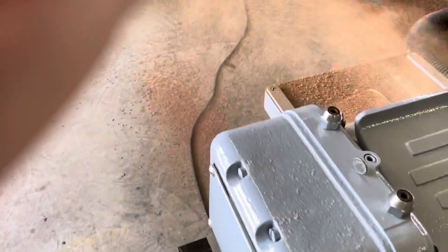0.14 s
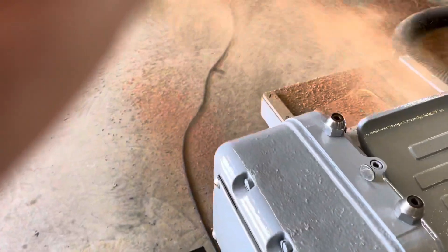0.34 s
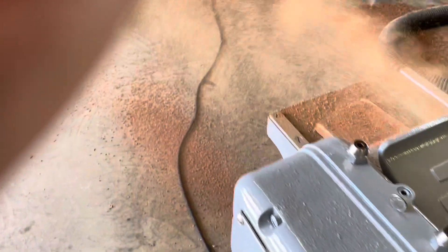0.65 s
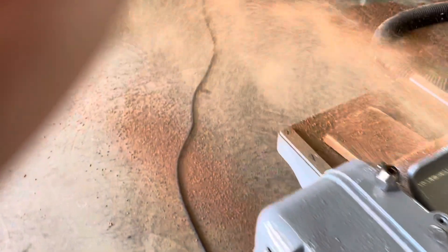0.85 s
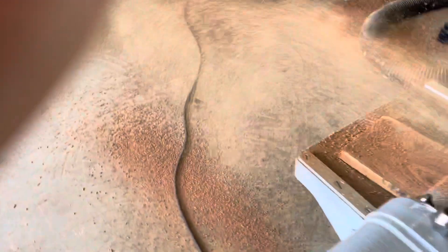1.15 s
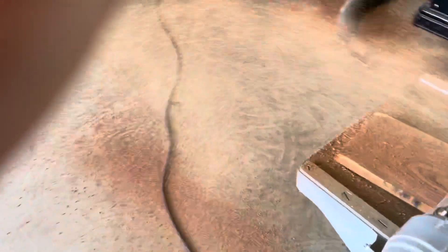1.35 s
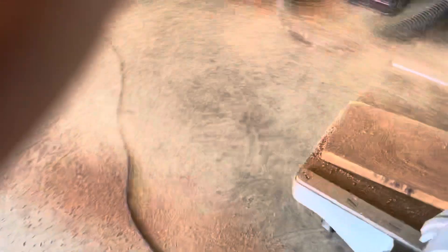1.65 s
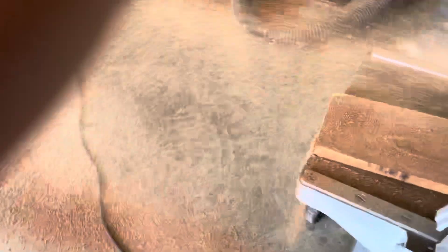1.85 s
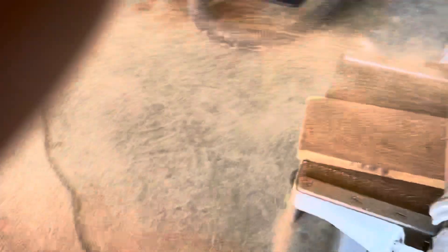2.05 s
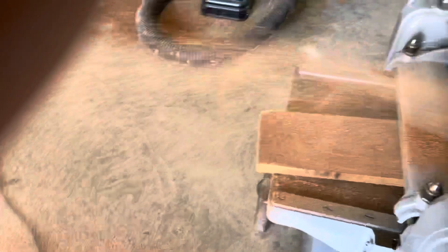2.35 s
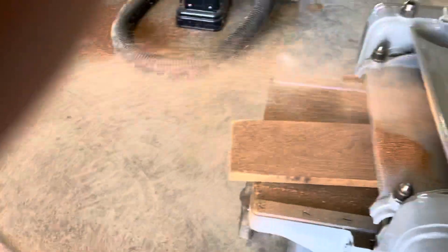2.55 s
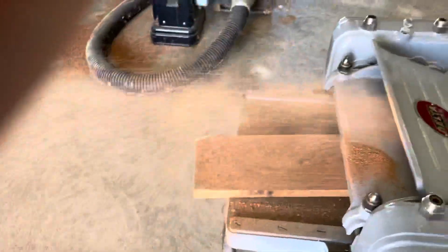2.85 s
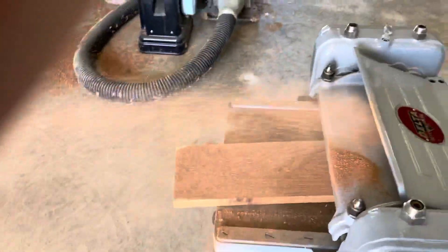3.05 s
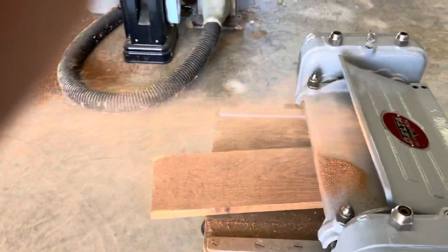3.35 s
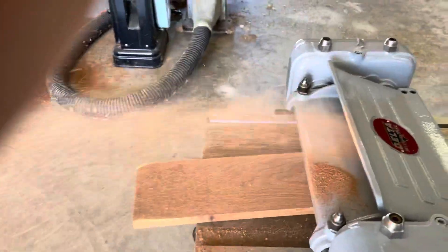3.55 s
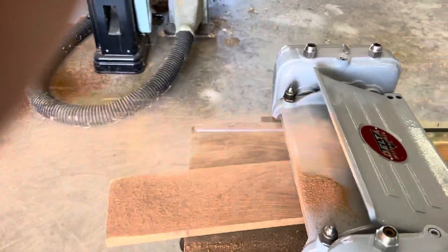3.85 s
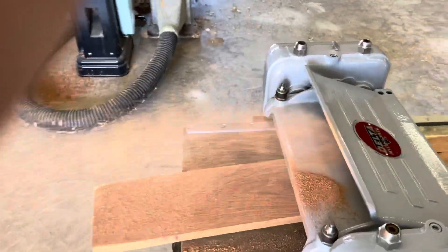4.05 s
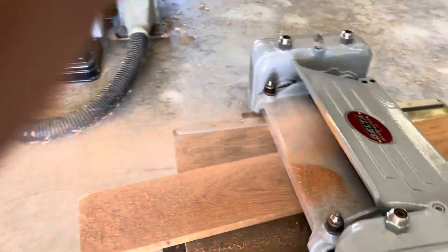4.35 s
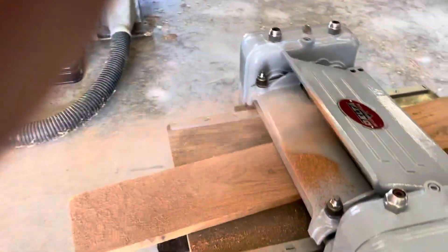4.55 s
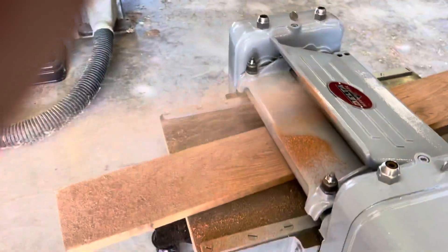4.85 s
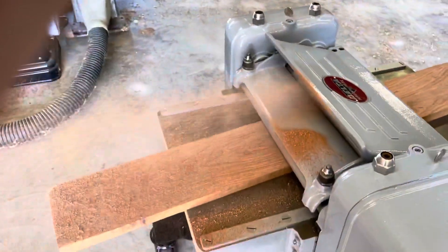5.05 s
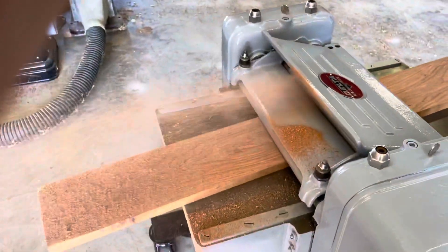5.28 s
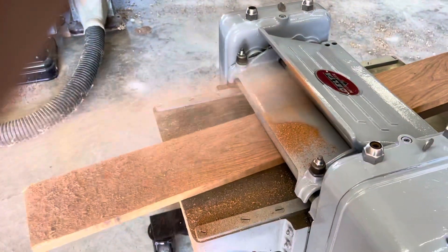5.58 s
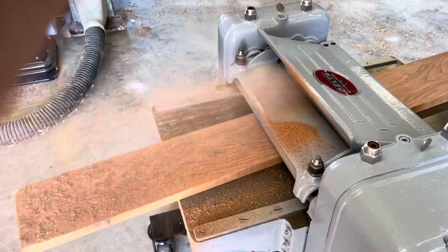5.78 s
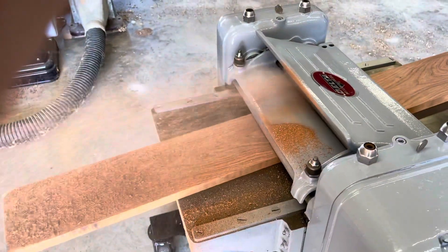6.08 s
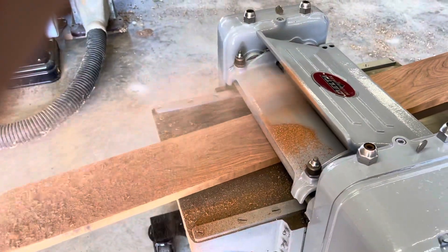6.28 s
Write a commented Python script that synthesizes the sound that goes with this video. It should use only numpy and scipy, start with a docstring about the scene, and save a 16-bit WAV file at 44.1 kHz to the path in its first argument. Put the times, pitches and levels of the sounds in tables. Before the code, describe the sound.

A thickness planer runs without pause in a small workshop. Under a steady low electrical hum, the cutterhead makes a fast, rough buzz with ringing metallic overtones. Air and wood chips rush and hiss. The close stereo microphone moves round the machine, so different metal tones swell and fade; the tearing of the board grows brighter and cracklier, with small knocks around the middle and later on.

```python
"""In a workshop, a thickness planer takes a light cut from a board while the microphone walks round it.
Three knives bite unevenly: click trains ring banks of resonances for the hood, bed and other parts.
Torn fibres are noise bursts at each bite, split into dull crush and bright hiss; hard bites knock the board.
The motor is steady sines with its hum at twice the mains frequency; shaped noise makes the rush of chips
and cooling air and a low rumble. The ringing also returns from the floor and the workshop."""
import sys
import numpy as np
from scipy import signal
from scipy.fft import rfft, irfft, next_fast_len
from scipy.io import wavfile
from scipy.ndimage import uniform_filter1d, map_coordinates

SR = 44100
rng = np.random.default_rng(int(sys.argv[2]) if len(sys.argv) > 2 else 0)


def generate_wav(sig):
    """Save sig (samples, or channels by samples) to the path in sys.argv[1] as 16-bit PCM at SR."""
    pcm = np.round(np.clip(np.atleast_2d(sig).T, -1, 1) * 32767).astype(np.int16)
    wavfile.write(sys.argv[1], SR, pcm)


N = 283122
TIME = np.arange(N) / SR
SIZE = next_fast_len(N + SR)
HZ = np.maximum(np.arange(SIZE // 2 + 1) * SR / SIZE, 1)

# how each part is heard on the walk; rows: frame, stand, base, rail, bed, table, roller, hood, guard,
# cover, chute, flap, baffle, lip, plate, gibs, knives, knife tips
# columns: start_level_db, drift_db_per_s, first_rise_db, first_s, first_spread_s,
# second_change_db, second_s, second_spread_s, swell_db, swell_top_s, ring_lag_ms
HEARD = [(-44.5, -0.2, 6.8, 4.86, 2.65, 0.5, 0.25, 0.25, 0.1, -0.051, 0.03),
         (-41.5, -1, 7, 4.82, 0.35, 3.5, 3.54, 0.35, 0.15, -0.98, -0.21),
         (-48, 1.24, 6.1, 5.07, 0.7, 6, 3.08, 0.56, 0.74, 0.52, -0.13),
         (-49.5, 2.36, 9.4, 2.95, 0.47, 2.5, 5.48, 0.23, 1.1, -0.16, -0.25),
         (-40, -0.4, 4.3, 3.3, 0.4, 3.5, 6.3, 0.26, 1.8, 0.37, -0.36),
         (-38, -0.21, 9.7, 4, 0.69, 3.5, 1.1, 0.14, 1.9, 0.033, -0.11),
         (-43.5, 1.7, 15.6, 0.23, 0.97, 3.5, 4.82, 0.17, 0.74, 0.3, -0.71),
         (-32, -0.01, 7, 3.63, 1.04, 3, 1.82, 0.45, 0.13, -1.4, -0.72),
         (-45.5, 2.5, 5.9, 1.8, 1.22, 2.5, 0.95, 0.15, 1.1, 0.77, -0.33),
         (-39, 1.6, 2.56, 5.13, 0.22, -38, 1.55, 0.25, 2.9, -0.006, -0.21),
         (-44, 2.1, 8.2, 1.68, 0.42, 5.5, 5.45, 0.37, 3, 0.35, -0.21),
         (-40.5, 0.25, 5.7, 1.6, 0.15, 3.5, 0.42, 0.33, 3, 0.000065, 0),
         (-42, 0.65, 1.7, 1.63, 0.11, 3.5, 0.33, 0.25, 1.1, -0.019, 0.01),
         (-57, 2.5, 8.5, 3.82, 0.35, 6.5, 5.47, 0.33, 0.64, 0.73, 0.13),
         (-58.5, 2, 14.4, 3.94, 0.5, 3, 6, 0.29, 1, -0.026, 0.14),
         (-66.5, 1.2, 13, 1.96, 0.19, -3, 4.5, 0.27, 0.77, -1.2, 0.25),
         (-57, 1.04, 12.5, 0.9, 0.46, 10, 1.7, .2, .6, -0.75, 0.35),
         (-59, -0.35, 14, 2.09, 0.1, 9, 1.64, 0.27, .6, -0.21, 0.33)]
HOOD_ROW = 7


def from_db(db):
    """Gain of a level in dB."""
    return 10 ** (np.asarray(db) / 20)


def rms_one(x):
    """Scaled to rms 1."""
    return x / np.sqrt(np.mean(x ** 2) + 1e-20)


def in_time(rows):
    """Columns of a curve table, interpolated at every sample."""
    s, *columns = np.transpose(rows)
    return [np.interp(TIME, s, column) for column in columns]


def at_hz(points):
    """A spectrum table on the FFT grid, interpolated over log frequency."""
    hz, value = np.transpose(points)
    return np.interp(np.log(HZ), np.log(np.maximum(hz, 1)), value)


def shaped(x, response):
    """Filtered by a response on the FFT grid."""
    return irfft(rfft(x, SIZE) * response, SIZE)[..., :N]


def resonate(x, hz, width_hz):
    """Two-pole resonance, gain 1 on top; a narrower width rings longer."""
    radius = np.exp(-np.pi * width_hz / SR)
    feed = np.array([1, 0, -1]) * (1 - radius * radius) / 2
    back = [1, -2 * radius * np.cos(2 * np.pi * hz / SR), radius * radius]
    return signal.lfilter(feed, back, x)


def clicks(at, size):
    """Clicks at fractional sample times, shared between the two nearest samples."""
    out, whole = np.zeros(N), at.astype(int)
    out[whole] = size * (1 - at + whole)
    out[whole + 1] = size * (at - whole)
    return out


def bump(centre_s, spread_s):
    """Bell-shaped rise and fall, top 1."""
    return np.exp(-.5 * ((TIME - centre_s) / spread_s) ** 2)


def heard_db(row):
    """A part drifts with distance, rises around one time, rises or dips around a second and swells slowly."""
    db, drift_db, first_db, first_s, first_spread_s = row[:5]
    second_db, second_s, second_spread_s, swell_db, top_s = row[5:-1]
    swell_period_s = 1.537   # shared by all the parts
    swell = swell_db * np.cos(2 * np.pi * (TIME - top_s) / swell_period_s)
    changes = first_db * bump(first_s, first_spread_s) + second_db * bump(second_s, second_spread_s)
    dip = -1.5 * bump(0.81, 0.11)   # every part dips briefly
    return db + drift_db * TIME + changes + swell + dip


def bites():
    """Three bites a turn of the cutterhead: time in samples, knife, extra tearing dB and knock size of each."""
    # how far the bites lead a steady pace as the path to the microphone shortens and lengthens:
    # start_s, lead_turns
    lead_curve = [(0, -.006), (.95, .008), (1.45, .039), (4.9, .037), (6.42, .011)]
    # bites into harder grain: start_s, extra_tear_db, knock_db
    hard_bites = [(.576, 5, -37), (1.458, 4, -27), (1.605, 3, -28), (1.87, 9, -35), (2.046, 8, -31),
                  (2.149, 11.5, -29), (2.208, 3, -29), (2.296, -1, -28), (2.384, 1, -29), (2.473, 6, -33),
                  (2.517, 5, -34), (2.825, -5, -28), (2.958, 7, -27), (3.222, 10, -32), (3.252, -2, -21),
                  (3.399, 7, -30), (3.737, 10, -28), (3.943, 4, -28), (3.972, 5, -32), (4.178, 6, -30),
                  (4.236, 5, -31), (4.369, 9, -23), (4.457, 13, -10), (4.516, 5, -25), (4.545, 6, -18),
                  (4.589, 8, -24), (4.736, 7, -30), (4.972, 2, -22), (5.016, 5, -30), (5.059, 4, -20),
                  (5.147, 6, -23), (5.236, 1, -27), (5.28, 8, -28), (6.045, 3, -29), (6.103, 8, -26),
                  (6.192, 4, -21)]
    head_hz, first_bite_turn = 68.03, .25
    wobble_turns, wobble_period_s, wobble_top_s = .006, .88, 1.55
    wobble = wobble_turns * np.cos(2 * np.pi * (TIME - wobble_top_s) / wobble_period_s)
    lead = in_time(lead_curve)[0] + wobble
    thirds = 3 * (head_hz * TIME + lead - first_bite_turn)   # turns counted in bites
    number = np.arange(np.ceil(thirds[0]), thirds[-1] - 1)
    at = np.interp(number, thirds, np.arange(N))
    hard_db, knock = np.zeros((2, len(at)))
    for s, db, knock_db in hard_bites:
        nearest = np.argmin(np.abs(at - s * SR))
        hard_db[nearest], knock[nearest] = db, from_db(knock_db)
    return at, (number % 3).astype(int), hard_db, knock


def bursts(at, size_db, rise_s, fall_s, steady_db):
    """Envelope that starts sharply with each bite and fades as the chip lifts, over a steady floor."""
    burst = clicks(at, from_db(size_db))
    for s in (rise_s, fall_s):
        burst = signal.lfilter([1], [1, -np.exp(-1 / (s * SR))], burst)
    # dividing by the running mean keeps the bursts near mean 1
    return burst / uniform_filter1d(burst, size=SR // 3) + from_db(steady_db)


def fibres(at, knife, hard_db, spread_db, crackle_db):
    """Two streams of snapping fibres: noise with random spikes, bunched at the bites."""
    # how hard each of the three knives tears: level_db
    knife_tear_db = [0, -3, -40]
    # ordinary bites vary, most on the first knife; bites into harder grain keep their set size
    chance = np.clip(rng.standard_normal(len(at)), -3, 1.5)
    vary_db = spread_db * np.where(knife == 0, 1, .6) * (hard_db == 0) * chance
    size_db = np.array(knife_tear_db)[knife] + hard_db + vary_db
    spikes_db = crackle_db * np.minimum(rng.exponential(1, (2, N)), 5)
    snaps = rng.standard_normal((2, N)) * from_db(spikes_db)
    return rms_one(snaps * bursts(at, size_db, rise_s=0.00069, fall_s=.0016, steady_db=-12))


def ringing(at, knife, bite_db, crunch, spread_db):
    """Every bite strikes the modes of each part; knives stand out unevenly, crushed grain shakes them too."""
    # modes of each part, in the row order of HEARD, levels relative within a part:
    # pitch_hz, width_hz, mode_db, second_knife_db, third_knife_db
    parts = [
        [(191, 215, -5.5, 11.5, 14), (287, 31, -32, -23, -26), (447, 37.2, 12, 5, 6.5),
         (482.8, 19, 7.5, 7, -20)],
        [(593, 194, 2, 5.5, 1.5)],
        [(759.7, 60, 23.5, 1.5, -2.5)],
        [(820.4, 71, 0, 1.5, -29)],
        [(889.6, 70, 15, -3.5, -51)],
        [(1105.7, 26, 0, 4, -1.5)],
        [(1299.3, 94, 2.5, 14.5, 13.5)],
        [(1454.2, 44, 9.5, 14, -6), (1670, 102, 9, 7, -3.5)],
        [(1785, 102, 9, 6.5, -26), (2000, 85, 8, 11, -19)],
        [(2140, 37, 3, 6.5, -33), (2154, 86, 11, 0, -48), (2307.4, 35, 13.5, -6, -37), (2349, 68, 13.5, 1, -38)],
        [(2437.5, 92, 0, -9, -35)],
        [(2535, 34, 0, -4.5, -13)],
        [(2642, 88, 9, -30, 1.5), (2766, 48, 7, -6.5, -13)],
        [(2965, 290, 0, -4, -5)],
        [(3180, 100, 20.5, 7.5, -31), (3500, 530, 0, -1, 5)],
        [(4250, 380, 0, -16, -8)],
        [(5180, 370, -10.5, 15, -28), (6200, 180, 2, -25, -24)],
        [(6940, 390, 0, 18, 6)],
    ]
    out = np.zeros(N)
    for modes, row in zip(parts, HEARD):
        lag_ms = max(row[-1], -.8)
        arrive = np.clip(at + lag_ms * SR / 1000, 0, N - 2)
        part = 0
        for k, (hz, width_hz, db, second_db, third_db) in enumerate(modes):
            size_db = np.array([0, second_db, third_db])[knife] + bite_db
            size_db = size_db + spread_db * rng.standard_normal(len(at))
            struck = clicks(arrive, from_db(size_db)) + crunch
            sign = (-1) ** k   # neighbouring modes in opposite phase
            part = part + sign * from_db(db) * resonate(struck, hz, width_hz)
        # a panel radiates little away from its own modes
        low, high = modes[0][0], modes[-1][0]
        part = resonate(part, np.sqrt(low * high), 0.89 * (high - low) + 0.23 * low)
        out += from_db(heard_db(row)) * rms_one(part)
    return out


def pings(at, knife, crunch):
    """Narrow rings, struck by the first knife and shaken by crushed grain, that come and go on the walk."""
    # pitch_hz, width_hz, level_db, loudest_s, spread_s, ring_lag_ms
    narrow_rings = [(614, 19, -52.5, 4.65, 0.57, 0.27), (887, 23, -51, 0.95, 1.2, 0.19),
                    (1090, 23, -47, 2.6, 0.7, .2), (1566, 33, -45.5, 1.9, 1.15, 0.11),
                    (541, 15, -47, 4.5, 0.33, 0.28), (821, 27, -46.5, 3, 0.56, 0.24),
                    (1157, 35, -52, 7.2, 0.85, .02), (1340, 26, -41, 4.7, 0.92, 0.017),
                    (1703.4, 17, -52.5, 4.1, 4.1, .02), (2314, 28, -41, 0.18, .5, 0.08),
                    (2311, 20, -43, 4.5, 1.7, 0.11), (2690, 19, -53.5, 0.48, 0.66, 0.078),
                    (2721, 12, -40, 5.9, 0.87, .15), (2696, 53, -40.5, 2.93, 0.43, 0.056),
                    (3006, 44, -44, 3.76, 0.73, 0.14), (3198, 19, -41.5, 4.8, 1.05, 0.17),
                    (3462, 40, -49.5, 2.2, 1.8, 0.03), (3834, 64, -51, 5.3, 2.9, 0.024),
                    (5360, 140, -52, 0.89, .5, 0.015), (4500, 140, -51, 1.5, 0.41, 0.014),
                    (5570, 120, -76, 1.6, 1.7, .02)]
    out = 0
    for hz, width_hz, db, s, spread_s, lag_ms in narrow_rings:
        arrive = np.clip(at + lag_ms * SR / 1000, 0, N - 2)
        struck = clicks(arrive, 1.0 * (knife == 0)) + .5 * crunch
        ring = resonate(resonate(struck, hz, width_hz), hz, 2 * width_hz)
        out = out + from_db(db) * bump(s, spread_s) * rms_one(ring)
    return out


def tearing(snaps, grind):
    """The fibres heard through the air: an even dull crush and a bright hiss, each with its own level."""
    # relative spectrum of torn fibres, shared by both: pitch_hz, level_db
    tear_colour = [(500, -67), (1200, 5), (1900, 3), (2500, 5.5), (3800, 3), (4800, -7.5), (6500, 2.5),
                   (8000, 0.5), (9500, 5.5), (11300, 3.5), (12700, 1), (14400, 6.5), (17000, 0.5)]
    # level of the dull crush: start_s, level_db
    crush_curve = [(0, -45), (.8, -62), (1.4, -48), (2.2, -47), (2.9, -43.5), (3.6, -39.5), (4.5, -38),
                   (5.5, -45), (6.42, -40)]
    # level of the bright hiss: start_s, level_db
    hiss_curve = [(0, -51), (.3, -47), (1.0, -47), (1.7, -41), (2.2, -35.5), (2.9, -39.5), (3.5, -40.5),
                  (4.3, -35), (4.9, -36), (5.6, -35.5), (6.42, -36)]
    split_hz = 4300
    colour = from_db(at_hz(tear_colour))
    dull = 1 / (1 + (HZ / split_hz) ** 12)
    crush = from_db(in_time(crush_curve)[0]) * rms_one(shaped(grind, colour * dull))
    hiss = from_db(in_time(hiss_curve)[0]) * rms_one(shaped(snaps, colour * (1 - dull)))
    return crush + hiss


def rush():
    """Cooling air and flying chips: two streams of shaped noise, slightly louder where the hood is louder."""
    # relative spectrum of the rush: pitch_hz, level_db
    air_colour = [(30, -31), (65, -10.5), (160, -14.5), (270, -5.5), (330, -10), (600, -10.5), (1100, -5),
                  (1600, -3.5), (2000, -5), (2500, -1), (3600, -15.5), (5000, -16.5), (9000, -19),
                  (16000, -26)]
    hood_db = heard_db(HEARD[HOOD_ROW])
    noise = shaped(rng.standard_normal((2, N)), from_db(at_hz(air_colour)))
    level_db = -36 + 0.05 * (hood_db - hood_db.mean())
    return from_db(level_db) * rms_one(noise)


def motor():
    """Magnetic hum and a belt tone: steady sines whose common level wavers a few times a second."""
    # pitch_hz, relative level_db
    partials = [(120.05, -1), (163.3, -26.5), (245, -30.5), (61, -52)]
    # level of the whole hum: start_s, level_db
    hum_curve = [(0.0, -31.5), (1.23, -30.5), (4.42, -29.5), (6.42, -30.5)]
    hum = sum(from_db(db) * np.sin(2 * np.pi * hz * TIME) for hz, db in partials)
    waver = rms_one(shaped(rng.standard_normal(N), 1 / (1 + (HZ / 6) ** 2)))
    waver_db = 0.56 * waver
    return np.sqrt(2) * from_db(in_time(hum_curve)[0] + waver_db) * hum


def rumble():
    """Low lumpy noise from hands and draught on the microphone."""
    # start_s, level_db
    rumble_curve = [(0, -66), (4.1, -65), (4.5, -56), (6.42, -57)]
    band = signal.butter(2, [45, 85], "band", fs=SR, output="sos")
    low = signal.sosfilt(band, rng.standard_normal(N))
    return from_db(in_time(rumble_curve)[0]) * rms_one(low)


def knocks(at, knock):
    """A hard bite knocks the board, which rings for a millisecond or two."""
    # modes of the board: pitch_hz, width_hz, relative level_db
    board_modes = [(1200, 450, -3), (1950, 500, 4.5), (2500, 500, 0), (3400, 800, -9)]
    lag_s = 0.000595
    arrive = np.minimum(at + lag_s * SR, N - 2)
    blow = resonate(clicks(arrive, -knock), 2000, 2500)
    out = 0
    for hz, width_hz, db in board_modes:
        gain = from_db(db) * SR / (2 * np.pi * width_hz)   # makes up for a narrow filter's weak click
        out = out + gain * resonate(blow, hz, width_hz)
    return out


def floor_echo(x):
    """Floor reflection: its gliding delay, as the microphone moves, makes single partials swell and fade."""
    # start_s, extra_delay_ms
    path_curve = [(0, 2.36), (.8, 3), (1.6, 6.1), (2.4, 5.5), (3.2, 2.75), (4, 3.25), (4.8, 3.58),
                  (5.6, 4.7), (6.42, 2.9)]
    late = np.arange(N) - in_time(path_curve)[0] * SR / 1000
    return from_db(-26.5) * map_coordinates(x, [late], order=3)


def workshop(x):
    """Room reverberation: eight feedback delays a side, duller on every round."""
    t60_s, wall_cut_hz = 0.13, 630   # decay time of the lows; treble dies sooner
    lags_ms = np.array([[23, 29, 31, 37, 41, 47, 53, 59], [25, 27, 34, 39, 43, 49, 51, 57]])
    out = []
    for side in lags_ms / 1000:
        response = 0
        for lag in side:
            wall = 1 / (1 + 1j * HZ / wall_cut_hz)
            loop = from_db(-60 * lag / t60_s) * np.exp(-2j * np.pi * HZ * lag) * wall
            response = response + loop / (1 - loop)   # all the rounds of one loop
        out.append(shaped(x, response))
    return np.array(out)


def ports(direct, diffuse):
    """Two close ports: direct sound differs in phase and level; diffuse noise is added with opposite signs."""
    # level difference: pitch_hz, left_minus_right_db
    balance = [(60, -7), (110, -1.0), (200, -1), (380, 4.5), (700, -3.5), (1290, 6), (2380, 5), (4400, 1),
               (8120, 1.5), (15000, -1)]
    # phase difference: pitch_hz, left_lead_radians
    phase_lead = [(400, 0), (1290, -.6), (2900, .2), (4600, .5), (5500, 3), (6800, 5.6), (7600, 3.6),
                  (9300, 3.1), (11500, .6), (16500, 0)]
    # gain of the diffuse noise: pitch_hz, level_db
    apart_share = [(40, 5), (120, -50), (300, -3), (700, 1), (2000, -1.5), (5000, 1.5), (9000, -11),
                   (15000, -15)]
    # each port takes half of the difference
    half = from_db(at_hz(balance) / 2) * np.exp(.5j * at_hz(phase_lead))
    apart = shaped(diffuse, from_db(at_hz(apart_share)))
    return shaped(direct + apart * [[1], [-1]], np.array([half, 1 / half]))


def scene():
    """Cut, motor, rush and room at the two ports."""
    # extra strength of the first knife in the ringing: start_s, level_db
    first_knife = [(0, 4.1), (1.8, 2.5), (3, 3), (4.5, 5), (6.42, 3.5)]
    at, knife, hard_db, knock = bites()
    snaps = fibres(at, knife, hard_db, spread_db=5.0, crackle_db=3.0)
    # crushed grain is more even than the snaps and answers less to hard bites
    grind = fibres(at, knife, .3 * hard_db, spread_db=1.8, crackle_db=.6)
    crunch = from_db(-39) * fibres(at, knife, .3 * hard_db, spread_db=1.8, crackle_db=.6)[0]
    first_db = np.interp(at / SR, *np.transpose(first_knife)) * (knife == 0)
    shared_db = 0.34 * rng.standard_normal(len(at))   # bite-to-bite change common to all parts
    rings = ringing(at, knife, first_db + shared_db, crunch, spread_db=.3)
    rings = rings + pings(at, knife, crunch) + knocks(at, knock)
    noise = tearing(snaps, grind) + rush()
    # the noise thins out in one band for a moment
    hole = bump(1.45, 0.13) * resonate(noise, 2230, 330)
    noise = noise - 0.57 * hole
    direct = rings + floor_echo(rings) + noise[0] + motor() + rumble()
    return ports(direct, noise[1]) + from_db(-4) * workshop(rings)


def record(dry):
    """A steep low-pass cuts the top above 15750 Hz."""
    top_cut = signal.ellip(12, .5, 70, 15750, fs=SR, output="sos")
    return signal.sosfilt(top_cut, dry)


dry = scene()
out = record(dry)
generate_wav(out)
```